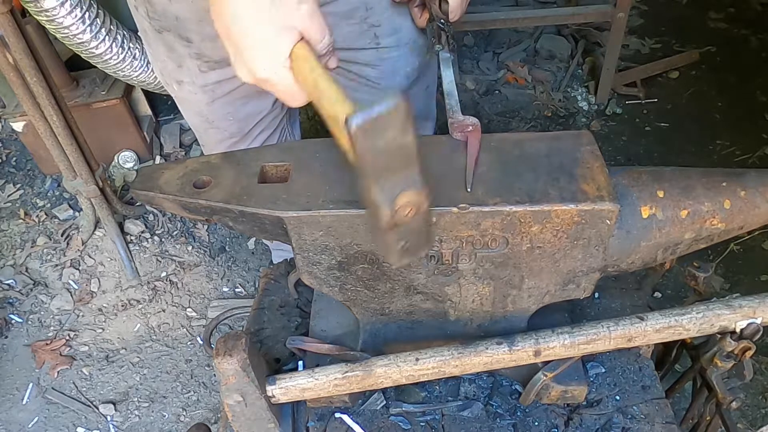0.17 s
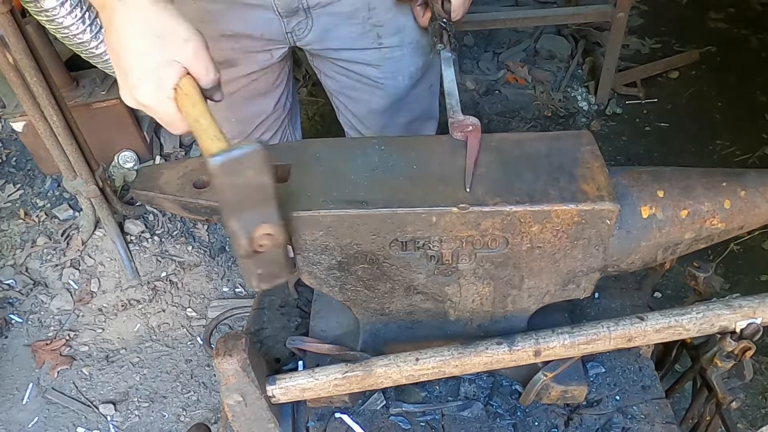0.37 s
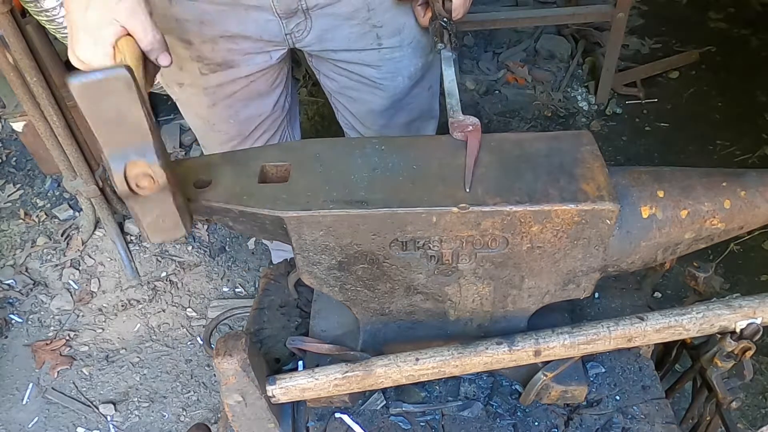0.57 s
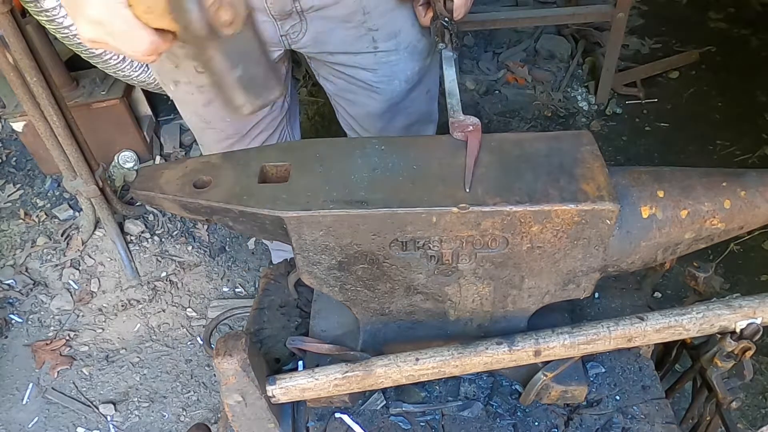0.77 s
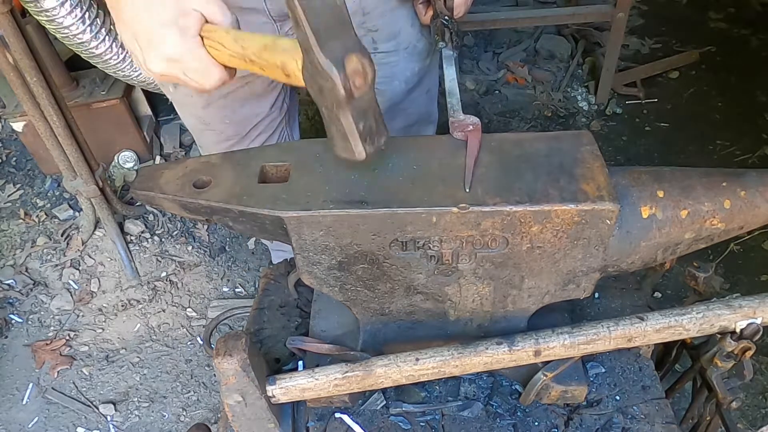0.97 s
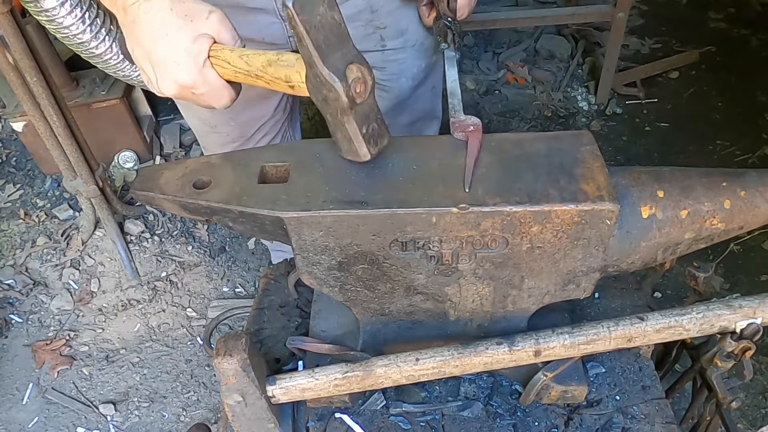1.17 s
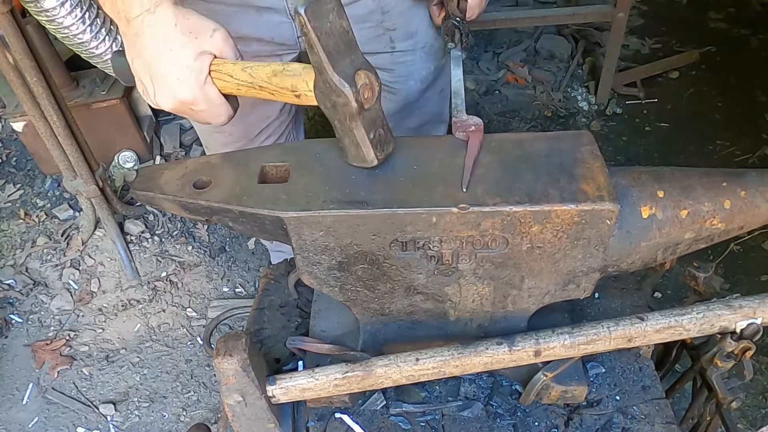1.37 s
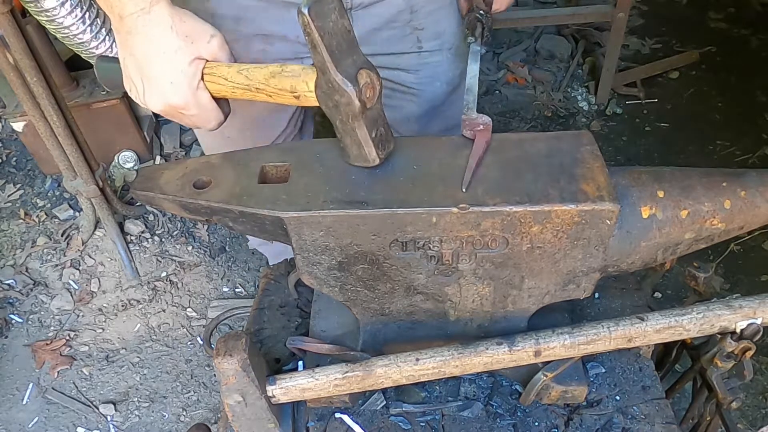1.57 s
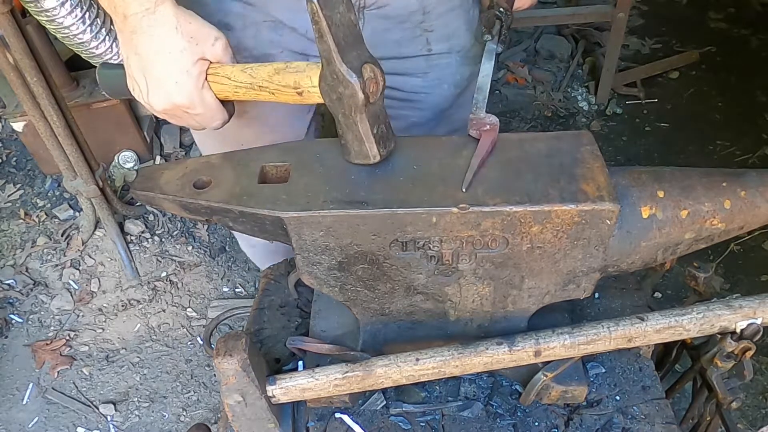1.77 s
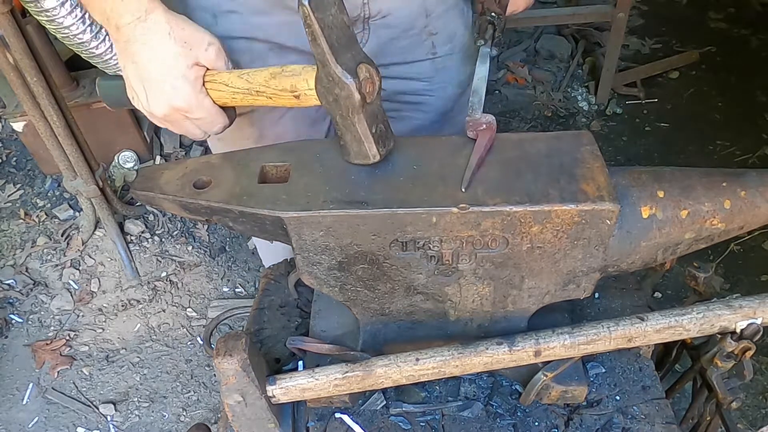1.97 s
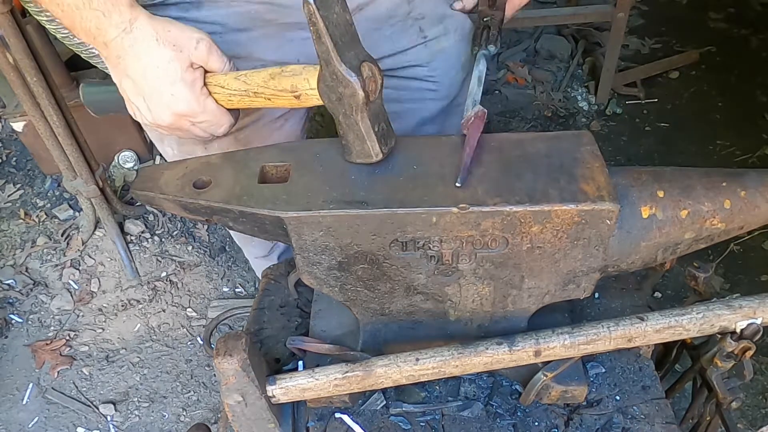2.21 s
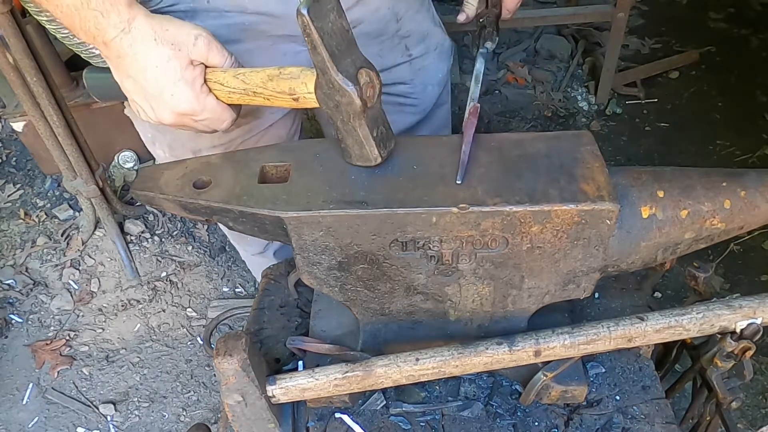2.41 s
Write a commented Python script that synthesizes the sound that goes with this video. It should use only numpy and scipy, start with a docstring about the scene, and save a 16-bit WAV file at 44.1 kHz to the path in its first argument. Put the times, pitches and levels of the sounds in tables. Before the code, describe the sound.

A high anvil ring as a hammer strikes hot steel once, then clinks in quickening bounces.

```python
"""An anvil rings as a smith strikes hot steel on it once; the work and tongs rattle and drag on its face.
The hammer is then let down on the bare face and bounces to rest. Each hit makes a short knock, feeds
the anvil's ringing tones, thuds through the stand and echoes in the workshop. Over a low rumble, the
smith shifts to turn the work, with rustling clothes and scuffing shoes.
A limiter turns the sound down at the loudest hits, so the ring swells back after them."""
import sys
import numpy as np
from scipy import signal
from scipy.io import wavfile
from scipy.ndimage import uniform_filter1d, minimum_filter1d

SR = 44100
rng = np.random.default_rng(int(sys.argv[2]) if len(sys.argv) > 2 else 0)


def generate_wav(sig):
    """Save sig (samples, or channels by samples) to the path in sys.argv[1] as 16-bit PCM at SR."""
    pcm = np.round(np.clip(np.atleast_2d(sig).T, -1, 1) * 32767).astype(np.int16)
    wavfile.write(sys.argv[1], SR, pcm)


N = 108045
TIME = np.arange(N) / SR
BAND_EDGES_HZ = 20 * 2 ** np.arange(0, 10, .5)
BAND_CENTRES_HZ = np.sqrt(BAND_EDGES_HZ[1:] * BAND_EDGES_HZ[:-1])


def from_db(db):
    """Turn decibels into a number to multiply by."""
    return 10 ** (np.asarray(db) / 20)


def unit_power(x):
    """Scale a sound to an average power of 1."""
    return x / np.sqrt(np.mean(x ** 2) + 1e-20)


def at_hz(table, hz, column=1):
    """Read between a table's rows, with pitch spaced in octaves."""
    rows = np.array(table)
    return np.interp(np.log(hz), np.log(rows[:, 0]), rows[:, column])


def pan(db):
    """Left and right gains, the left louder by db."""
    return from_db(np.array([[db], [-db]]) / 2)


def dying(t, fade_s):
    """Silent before t = 0, then dying away. A fade time is how long a 60 dB drop takes."""
    return (t >= 0) * np.exp(-np.log(1000) * np.maximum(t, 0) / fade_s)


def lowpass(x, hz):
    """Dull a sound by cutting what lies above hz."""
    return signal.sosfilt(signal.butter(4, min(hz, .45 * SR), fs=SR, output="sos"), x + 1e-18)


def bandpass(x, low_hz, high_hz, order):
    """Keep what lies between two pitches."""
    return signal.sosfilt(signal.butter(order, [low_hz, high_hz], "band", fs=SR, output="sos"), x + 1e-18)


def ring(x, hz, fade_s):
    """Each click in x starts a fading tone as tall as the click."""
    decay, step = dying(1 / SR, fade_s), 2 * np.pi * hz / SR
    return signal.lfilter([0, np.sin(step)], [1, -2 * decay * np.cos(step), decay * decay], x + 1e-18)


# how alike left and right sound: (pitch [Hz], likeness [0 to 1])
LIKENESS = [(100, .97), (1000, .94), (3000, .7), (10000, .2)]
def noise_bands():
    """Stereo noise in half-octave slices; the two sides are less alike in the treble."""
    white, bands = rng.standard_normal((2, 2, N)), []
    for k, hz in enumerate(BAND_CENTRES_HZ):
        mid, side = bandpass(white[k % 2], *BAND_EDGES_HZ[k:k + 2], order=2)
        alike = at_hz(LIKENESS, hz)
        bands.append(unit_power(np.sqrt(1 + alike) * mid + np.sqrt(1 - alike) * side * [[1], [-1]]))
    return np.array(bands)


def coloured(bands, spectrum):
    """Mix the slices into noise with the given balance of low and high."""
    gains = from_db(at_hz(spectrum, BAND_CENTRES_HZ)) * np.sqrt(BAND_CENTRES_HZ)
    return unit_power(np.tensordot(gains, bands, 1))


# the tone of the background: (pitch [Hz], relative level [dB])
RUMBLE_COLOUR = [(20, -6), (55, 12.5), (120, 12.5), (200, -40.5), (500, -16), (1500, -27), (5000, -31.5),
                 (15000, -52.5)]
def rumble(level_db=-54.5):
    """A faint, steady, low noise."""
    return from_db(level_db) * coloured(noise_bands(), RUMBLE_COLOUR)


# the tone of clothes and grit: (pitch [Hz], relative level [dB])
RUSTLE_COLOUR = [(50, 21), (170, 8), (280, -0.5), (450, -3.5), (1300, -3.5), (3000, -11.5), (5000, -14.5),
                 (9000, -25), (15000, -46.5)]
# how the rustle rises and falls: (time [s], relative level [dB])
RUSTLE_LEVELS = [(0, -19), (1.5, 0.5), (1.8, 4.5), (1.95, 0), (2.1, 7.5), (2.45, 6)]
# shoe and tong scuffs: (time [s], rise [s], fade [s], level [dB], pitch [Hz], width [octaves])
SCUFFS = [(2.006, 0.015, 0.048, -46.5, 2140, 0.66), (2.01, 0.017, 0.12, -41.5, 185, 1),
          (2.026, 0.013, 0.15, -46, 1290, 0.98), (2.15, .01, 0.092, -63, 2400, 0.78),
          (2.265, 0.0017, .25, -56.5, 1260, 0.77), (2.329, .015, 0.14, -51, 704, 1.36),
          (2.382, 0.009, .16, -57.5, 5350, 0.65)]
def smith(rustle_db=-59):
    """Clothes and grit rustle; shoes and tongs scuff as the work is turned."""
    bands = noise_bands()
    loudness = from_db(rustle_db + np.interp(TIME, *np.transpose(RUSTLE_LEVELS)))
    out = loudness * coloured(bands, RUSTLE_COLOUR)
    for start, rise, fade, db, hz, octaves in SCUFFS:
        colour = np.exp(-.5 * (np.log2(BAND_CENTRES_HZ / hz) / octaves) ** 2)
        swell = np.clip((TIME - start) / rise, 0, 1) * dying(np.maximum(TIME - start - rise, 0), fade)
        out += from_db(db) * swell * unit_power(np.tensordot(colour, bands, 1))
    return out


# the room's echo of a knock: (pitch [Hz], relative level [dB], fade [s])
ECHO = [(101, -22, 0.29), (250, -17.5, 0.19), (575, -26.5, 0.21), (1100, -15.5, 0.16), (2380, -20, 0.23),
        (4500, -15.5, 0.15), (6880, -64, .16), (13720, -35, 0.11)]
def workshop(on_work, on_face, work_db=6, face_db=-5, early_db=13.5):
    """Each knock bounces off the floor and tools, then leaves a short tail."""
    early = from_db(early_db) * dying(TIME, fade_s=.041)
    echo = np.zeros((2, N))
    for hz, band in zip(BAND_CENTRES_HZ, noise_bands()):
        bass_cut = min(hz / ECHO[0][0], 1)
        tail = dying(TIME, at_hz(ECHO, hz, column=2))
        echo += band * from_db(at_hz(ECHO, hz) - 6.5) * bass_cut * (early + tail)
    fade_in = 1 - dying(TIME, fade_s=.004)
    push = from_db(work_db) * on_work + from_db(face_db) * on_face
    return signal.fftconvolve(echo * fade_in, push[None], axes=1)[:, :N]


# steel sliding over the face after the blow: (time [s], relative level [dB])
DRAG_LEVELS = [(.27, -66.5), (.33, -18.5), (.39, -3), (.42, 0.5), (.47, -2.5), (.51, -13.5), (.57, -15),
               (.62, -9.5), (.68, -11), (.72, -32), (.76, -56.5)]
# tones of that steel and the face under it: (pitch [Hz], fade [s], level [dB])
DRAG_TONES = [(125, .08, -48), (230, .08, -50), (420, .02, -53), (680, .015, -54), (885, .08, -48),
              (985, .1, -48), (1400, .008, -53), (2322, .2, -40), (3460, .1, -59), (4180, .07, -57),
              (5569, .2, -61), (6400, .1, -58), (9000, .02, -70)]
def drag(slips_per_s=2000, spread_db=2, top_hz=7500):
    """Scale, the crust on hot steel, grinds as it slides: many tiny slips set the metal ringing."""
    slips = (rng.random(N) < slips_per_s / SR) * rng.choice([-1, 1], N)
    slips = slips * from_db(spread_db * np.minimum(rng.exponential(1, N), 4))
    slips = unit_power(slips) * from_db(np.interp(TIME, *np.transpose(DRAG_LEVELS)))
    # the square root stops long tones from piling up louder than short ones
    grinding = sum(from_db(db) * ring(slips, hz, fade) * np.sqrt(4 * np.log(1000) / (fade * SR))
                   for hz, fade, db in DRAG_TONES)
    return lowpass(grinding, top_hz)


# the stand's tones: (pitch [Hz], fade [s], level for hits on the work [dB], on the face [dB])
STAND_TONES = [(65.2, 0.18, 0, -22.5), (134, 0.11, 3.5, -20), (222.8, 0.077, 7, -15.5),
               (282.2, 0.082, -0.5, -17), (403, 0.071, -1.5, -16.5), (1030, .1, -12, -20)]
def stand(on_work, on_face, delay_s=.002, top_hz=540):
    """The stand under the anvil thuds a moment after each hit."""
    thud = sum((-1) ** k * ring(from_db(work_db) * on_work + from_db(face_db) * on_face, hz, fade)
               for k, (hz, fade, work_db, face_db) in enumerate(STAND_TONES))
    return pan(db=-1) * np.interp(TIME - delay_s, TIME, lowpass(thud, top_hz))


# Three lists of hits, each with (time [s], knock level [dB], ring level [dB], brightness [Hz]).
# the hammer on the hot steel: a light touch, then the blow
BLOWS = [(.2259, -39, -42, 3600), (.2367, 0, 0, 14000)]
# the hammer bouncing on the bare face
BOUNCES = [(1.1773, 5.5, 8.5, 9150), (1.2975, 14.5, 14.5, 7500), (1.3678, 8.5, 7.5, 5560),
           (1.4157, -3.5, -3.5, 6000), (1.4502, -8, -21, 4500), (1.4745, -12.5, -13, 3400),
           (1.4900, -16, -39, 2800), (1.4990, -20.5, -25, 2500)]
# the work and tongs rattling on the face
RATTLES = [(0.3583, -18, -26, 3670), (0.369, -23.5, -40, 2520), (0.407, -17, -47, 329),
           (0.4369, -28.5, -44, 1510), (0.459, -25.5, -39, 1100), (0.528, -24.5, -42, 1420),
           (0.576, -42.5, -30, 2040), (0.6445, -38, -30.5, 2420), (0.712, -55, -29, 1800)]
def pushes():
    """Each hit is one short push, on the work or on the face; softer hits are duller."""
    return [sum(from_db(db) * lowpass(signal.unit_impulse(N, int(start * SR)), hz)
                for start, db, _, hz in hits)
            for hits in (BLOWS, BOUNCES + RATTLES)]


def crack(gain_db=8, fade_s=.013, low_hz=3080):
    """Scale breaks under the hammer in a bright burst; a light touch gives a duller one."""
    burst = sum(from_db(db) * lowpass(dying(TIME - start, fade_s) * rng.standard_normal((2, N)), hz)
                for start, _, db, hz in BLOWS)
    return from_db(gain_db) * bandpass(burst, low_hz, 2 * low_hz, order=1)


# a knock on the hot steel: (pitch [Hz], fade [s], level [dB])
WORK_KNOCK = [(1150, 0.0085, 19.5), (1836, 0.003, 26.5), (1990, 0.025, 20), (2610, 0.01, 9.5)]
# a knock on the bare face: (pitch [Hz], fade [s], level [dB])
FACE_KNOCK = [(1150, .004, 8), (1900, .0022, 14), (3000, .002, 5)]
def knocks(on_work, on_face, left_delay_samples=.99):
    """Steel stops dead with a sharp knock that reaches the right side first."""
    knock = sum((-1) ** k * from_db(db) * ring(push, hz, fade)
                for push, tones in ((on_work, WORK_KNOCK), (on_face, FACE_KNOCK))
                for k, (hz, fade, db) in enumerate(tones))
    delayed = np.interp(np.arange(N) - left_delay_samples, np.arange(N), knock)
    return pan(db=-3.5) * np.array([delayed, knock])


# the anvil's tones and the side each leans to: (pitch [Hz], left minus right [dB])
ANVIL_TONES = [(1941.5, -3), (2075.8, -15), (2321.7, 1), (2434.7, -1.5), (2794, 0), (3460, -3), (4001, 0),
               (4160, -1), (4424, 0), (4770, -4), (5005, -4), (5569, -1.5), (5822, 0), (6382, -2),
               (6476, 0), (6858, 0), (8156, 0), (8904, 0), (9540, -2), (10137, 1), (10713, 2), (12150, 4),
               (13300, 4), (14500, 4)]
# how those same tones ring: (fade [s], level for hits on the work [dB], on the face [dB])
ANVIL_RINGING = [(0.76, -13.5, -26), (1.23, -10.5, -49), (0.36, -10, -17.5), (0.52, -17.5, -15),
                 (.12, -38.5, -35.5), (0.15, -32.5, -20), (0.07, -36, -16), (0.14, -17.5, -43.5),
                 (0.16, -47, -25), (0.15, -39, -19.5), (0.27, -17, -27.5), (0.35, -49.5, -24),
                 (0.23, -48, -28), (0.13, 2.5, -5.5), (0.22, -25, -31.5), (.18, -17, -48.5),
                 (0.31, -32, -52), (0.28, -33, -40.5), (0.16, -14, -31.5), (0.16, -41, -57),
                 (.26, -30, -67.5), (.24, -41, -64.5), (0.26, -39, -62), (.23, -48, -55.5)]
# tones still sounding from an earlier blow: (tone number [from 0], level [dB])
STILL_RINGING = [(0, -41.5), (1, -33.5)]
def anvil(onset_hz=970, echo_db=-16.5, echo_fade_s=.28):
    """Each hit feeds the anvil's tones, mostly those below its brightness; where it lands sets the mix."""
    out = np.zeros((2, N))
    for k, ((hz, pan_db), (fade, work_db, face_db)) in enumerate(zip(ANVIL_TONES, ANVIL_RINGING)):
        fed = np.zeros(N)
        fed[0] = sum(from_db(db) ** 2 for tone, db in STILL_RINGING if round(tone) == k)
        for hits, tone_db in ((BLOWS, work_db), (BOUNCES + RATTLES, face_db)):
            for start, _, db, bright_hz in hits:
                fed[int(start * SR)] += from_db(db + tone_db) ** 2 / (1 + (hz / bright_hz) ** 4)
        energy = signal.lfilter([1], [1, -dying(2 / SR, fade)], fed + 1e-18)  # adds up and leaks away
        swing = lowpass(np.sqrt(energy), onset_hz)  # a tone takes a moment to build
        side_phase = np.arccos(at_hz(LIKENESS, hz)) * np.array([[0], [1]])
        out += pan(pan_db) * swing * np.sin(2 * np.pi * (hz * TIME + rng.random()) + side_phase)
    walls = unit_power(rng.standard_normal((2, N)) * dying(TIME, echo_fade_s)) / np.sqrt(N)
    return out + from_db(echo_db) * signal.fftconvolve(out, walls, axes=1)[:, :N]


def scene():
    """The anvil, the hits and the sliding steel, over the room and the smith's movements."""
    on_work, on_face = pushes()
    room = workshop(on_work, on_face) + rumble()
    hits = knocks(on_work, on_face) + crack() + stand(on_work, on_face)
    return room + hits + anvil() + drag() + smith()


def record(dry, limit_db=-.5, attack_s=.00058, release_s=.095, top_hz=17500):
    """A limiter ducks just before each peak and recovers fast, then slowly; the highest treble is cut."""
    over_db = np.maximum(20 * np.log10(np.abs(dry).max(axis=0) + 1e-9) - limit_db, 1e-9)
    release = TIME / release_s
    duck_db = np.exp(np.maximum.accumulate(np.log(over_db) + release) - release)
    span = int(attack_s * SR)
    gain_db = uniform_filter1d(minimum_filter1d(-duck_db, span), span)
    limited = np.clip(dry * from_db(gain_db), -1, 1)
    return signal.sosfilt(signal.cheby2(12, 70, top_hz, fs=SR, output="sos"), limited)


dry = scene()
out = record(dry)
generate_wav(out)
```